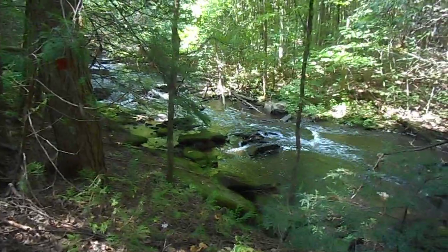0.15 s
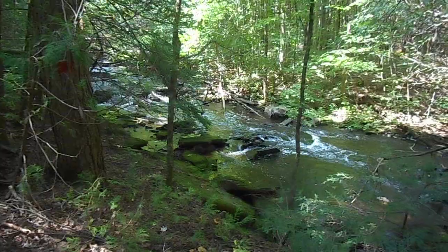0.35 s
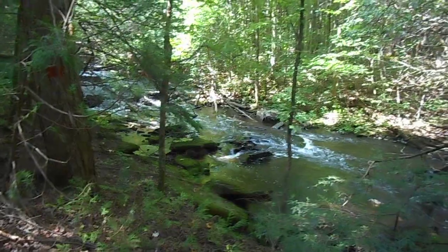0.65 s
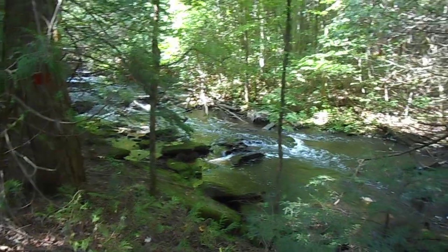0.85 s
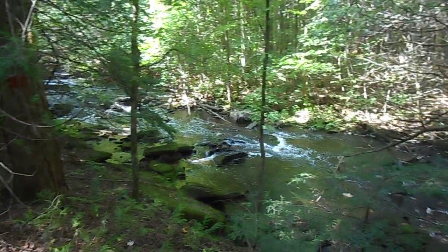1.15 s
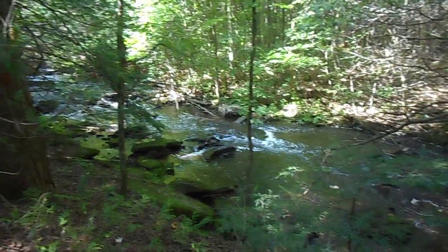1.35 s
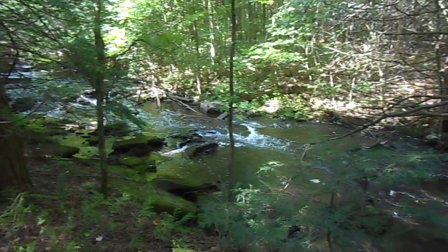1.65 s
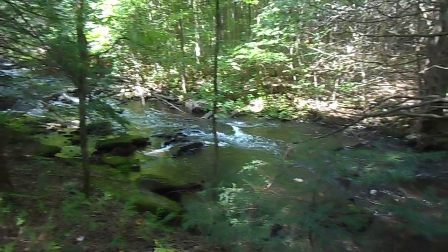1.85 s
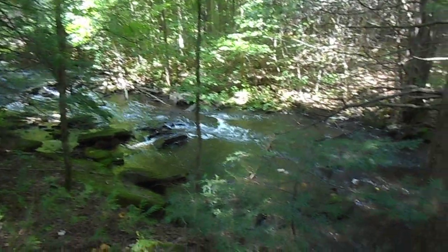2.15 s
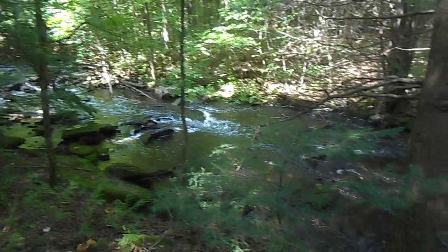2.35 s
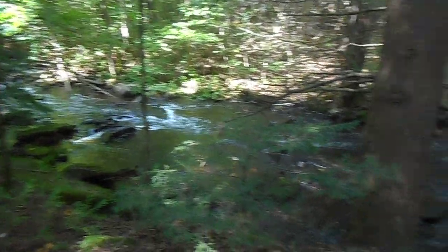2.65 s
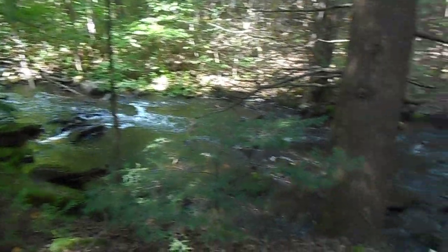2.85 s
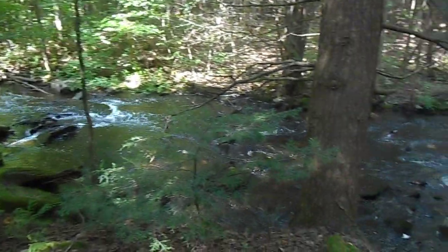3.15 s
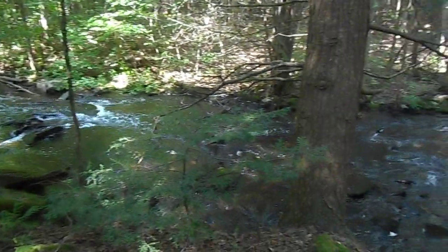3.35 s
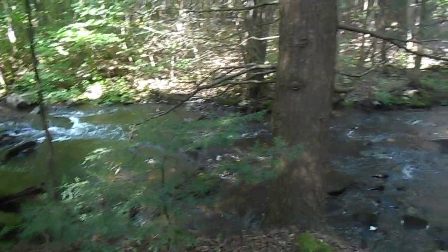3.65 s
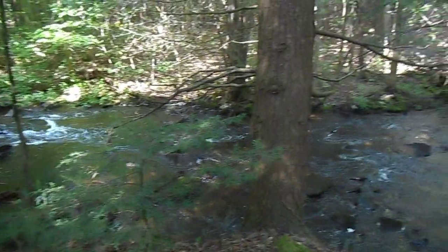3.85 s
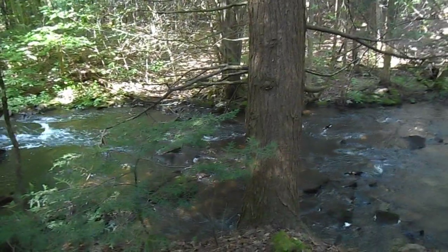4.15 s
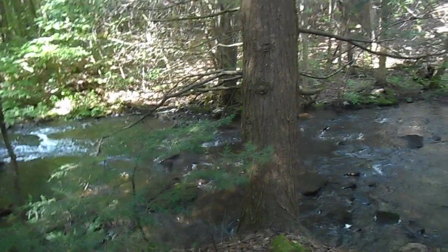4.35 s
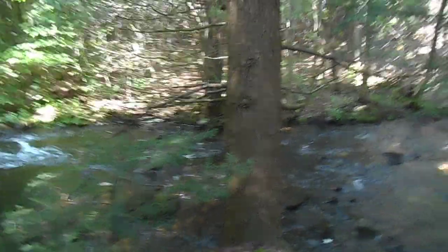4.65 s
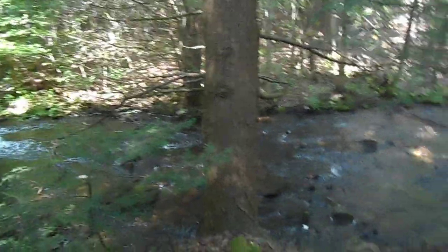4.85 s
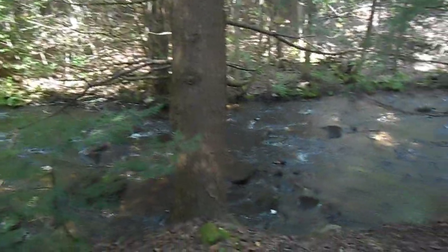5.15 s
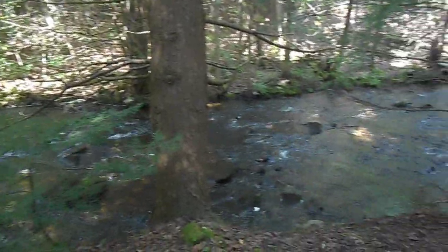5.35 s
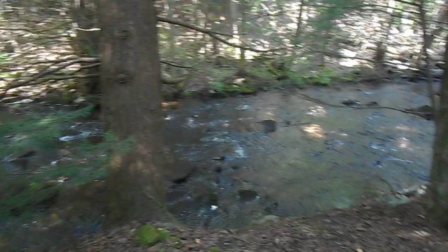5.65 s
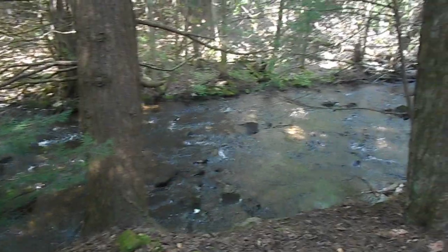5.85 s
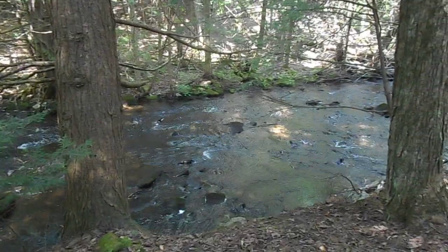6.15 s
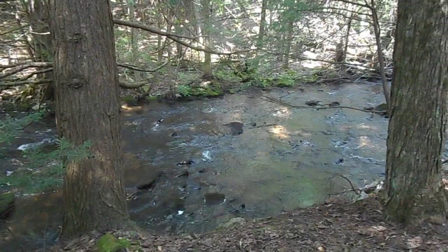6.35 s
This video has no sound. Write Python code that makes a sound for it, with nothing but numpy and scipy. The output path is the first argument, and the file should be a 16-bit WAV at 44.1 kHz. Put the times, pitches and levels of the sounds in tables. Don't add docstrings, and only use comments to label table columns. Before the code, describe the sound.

From 0 to 6.5 seconds a small creek pours over rocks in a wood, some metres away, in mono. It is a continuous dense hiss of innumerable bubbles, strongest in the midrange, with fine fizz above and tiny quick fluctuations; a barely audible low drone lies far behind. Soft breeze puffs bump the microphone at about 0.3-0.5 and 0.8-0.9 seconds, lightly around 1.5 and 2.3, then most strongly at 3.4-3.5, with a small one at 4.3-4.4. Faint spray ticks are scattered to about 4.2; clearer drops pop around 1.0, 1.7, 2.2, 2.5, 3.0 and 3.3. Short hollow gurgles surface now and then, mostly between 1 and 3 seconds. As the microphone turns to the pool, the hiss becomes slightly softer and duller. Drops snap at 5.9 and 6.1, and a louder clustered plop lands at 6.4 just before the end.

```python
import sys
import numpy as np
from scipy import signal
from scipy.fft import rfft, irfft, next_fast_len
from scipy.io import wavfile
from scipy.ndimage import uniform_filter1d, map_coordinates

SR = 44100
rng = np.random.default_rng(int(sys.argv[2]) if len(sys.argv) > 2 else 0)


def file_out(sig):
    cols = np.atleast_2d(sig).T
    lim = np.clip(cols, -1, 1)
    pcm = np.round(lim * 32767).astype(np.int16)
    wavfile.write(sys.argv[1], SR, pcm)


def nominal_scale(level):
    x = np.asarray(level, float) / 20
    return 10 ** x


N = 287091


def unit(x):
    return x / np.sqrt(np.mean(x ** 2) + 1e-20)


def curve(rows):
    time_s, value = np.transpose(rows)
    return np.interp(np.arange(N) / SR, time_s, value)


def wobble(knots_per_s):
    knots = rng.standard_normal(int(N * knots_per_s / SR) + 4)
    return map_coordinates(knots, [np.arange(N) * knots_per_s / SR])


def coloured(x, points):
    size = next_fast_len(N + 8192)
    freq_hz, level_db = np.transpose(points)
    log_f = np.log(np.fft.rfftfreq(size, 1 / SR) + 1)
    gain = nominal_scale(np.interp(log_f, np.log(freq_hz + 1), level_db))
    return irfft(rfft(x, size) * gain, size)[:N]


def patchy(depth_db):
    z = signal.stft(rng.standard_normal(N), nperseg=256)[2]
    field = rng.standard_normal(z.shape)
    field = uniform_filter1d(field, size=5, axis=0)
    field = uniform_filter1d(field, size=8, axis=1)
    return unit(signal.istft(z * nominal_scale(depth_db * unit(field)), nperseg=256)[1][:N])


def bubbles(start, gain, pitch_hz, cycles, size):
    t = np.arange(size) / SR
    age = t * (pitch_hz / cycles)[:, None]
    phase = 2 * np.pi * pitch_hz[:, None] * t * (1 + .1 * age)
    onset = 1 - np.exp(-age / .06)
    ring = gain[:, None] * np.sin(phase) * nominal_scale(-26 * age) * onset
    where = (start * SR).astype(int)[:, None] + np.arange(size)
    return np.bincount(where.ravel(), ring.ravel(), N + size)[:N]


def swarm(count, low_hz, high_hz, cycles, spread_db, size):
    when, pitch, luck = rng.random((count, 3)).T
    pitch_hz = low_hz + (high_hz - low_hz) * pitch
    gain = np.sqrt(pitch_hz) * nominal_scale(-spread_db * np.log(1.004 - luck))
    return unit(bubbles(when * N / SR, gain, pitch_hz, np.full(count, cycles), size))


# time_s, facing (0 riffle - 1 pool)
TURN = [
    (0, 0.12),
    (1, 0.056),
    (2.4, 0.28),
    (3.4, 0.21),
    (3.8, 0.57),
    (5.2, 0.64),
    (5.8, 1),
    (6.51, 0.93),
]


def facing_pool():
    return curve(TURN)


# freq_hz, width_hz, riffle_db, pool_db
HOLLOWS = [(350, 230, -1.5, 2.3), (700, 220, 1.5, -2.5), (1060, 160, 1.3, 1.5), (1350, 250, -3, 0),
           (1615, 110, 2.3, -.5), (2420, 460, 1.5, 1.4), (2740, 150, -1.5, -0.5), (3200, 340, 1, 0)]


def hollowed(x):
    size = next_fast_len(N + 8192)
    f = np.fft.rfftfreq(size, 1 / SR)
    freq_hz, width_hz, *views_db = np.transpose(HOLLOWS)[:, :, None]
    bump = 1 / (1 + ((f - freq_hz) / (width_hz / 2)) ** 2)
    spectrum = rfft(x, size)
    riffle, pool = (irfft(spectrum * nominal_scale((db * bump).sum(axis=0)), size)[:N] for db in views_db)
    turn = np.clip(facing_pool(), 0, 1)
    return (1 - turn) * riffle + turn * pool


# time_s, level_db
FLOW = [(0, -30), (.8, -30), (1.6, -30.5), (2.4, -30), (3.3, -31), (4.9, -30.5), (5.3, -31), (6.51, -31.5)]
# freq_hz, level_db (per Hz)
WATER = [(70, -44), (150, -24), (290, -12), (350, -14), (480, -10), (625, -2), (760, -0.26), (1050, -0.5),
         (2200, -3), (3300, -5.5), (4500, -10), (6300, -16.5), (8400, -25.5), (9500, -32.5)]
SPRAY_AWAY_DB = -1.46


def creek():
    water_db = curve(FLOW)
    spray_db = SPRAY_AWAY_DB * facing_pool()
    surge = 0.072 * wobble(6) + 0.34 * wobble(60) + 0.23 * wobble(300)
    gurgle = swarm(count=6000, low_hz=547, high_hz=3533, cycles=10.8, spread_db=1.5, size=800)
    fizz = swarm(count=7000, low_hz=2494, high_hz=10360, cycles=14.7, spread_db=3, size=200)
    crackle = swarm(count=1500, low_hz=5100, high_hz=10400, cycles=1.6, spread_db=2.5, size=30)
    body = unit(patchy(depth_db=0.34) + nominal_scale(-18.0) * gurgle)
    spray = unit(patchy(depth_db=0.07) + nominal_scale(-10.5) * fizz + nominal_scale(-16.5) * crackle)
    low = signal.butter(1, 2500, "low", fs=SR)
    high = signal.butter(1, 2500, "high", fs=SR)
    treble = nominal_scale(spray_db + 0.35 * surge) * signal.lfilter(*high, spray)
    mix = signal.lfilter(*low, body) + treble
    return nominal_scale(water_db - 0.27 + 1.08 * surge) * unit(hollowed(coloured(mix, WATER)))


# freq_hz, level_db (per Hz)
DRONE = [(60, -60), (90, -6), (107, -1), (125, -5), (170, -60)]


def distant_drone():
    return nominal_scale(-72) * unit(coloured(rng.standard_normal(N), DRONE))


# start_s, hold_s, level_db
GUSTS = [(.15, .03, -64), (0.312, 0.24, -52.5), (0.698, .04, -49), (.82, 0.15, -56), (1.03, .04, -59),
         (1.24, 0.089, -59), (1.38, .04, -68), (1.47, .04, -50), (1.6, .03, -64), (1.738, .04, -62),
         (1.85, .2, -67), (2.24, 0.078, -56), (2.45, .05, -58), (2.55, .04, -63), (2.76, .02, -56),
         (3.404, 0.11, -43.5), (3.65, .06, -60), (4.03, .02, -64), (4.29, .14, -59), (6.12, .03, -59),
         (6.25, .05, -64)]
# time_s, peak_db, pitch_hz
PUFFS = [(.342, -45, 110), (.405, -40, 120), (.423, -33.5, 237), (0.838, -41, 140), (0.847, -39, 120),
         (0.879, -43, 130), (.924, -47, 70), (1.26, -49, 80), (1.491, -51, 110), (1.75, -52, 60),
         (2.258, -46, 100), (2.292, -42, 120), (2.47, -48, 120), (2.55, -54, 80), (2.771, -46, 120),
         (3.392, -37, 220), (3.424, -33, 231), (3.44, -36, 300), (3.453, -40, 300), (3.461, -34, 250),
         (3.498, -39, 200), (3.51, -25.5, 270), (4.299, -52, 70), (4.345, -41, 150), (4.404, -46, 150)]
# freq_hz, level_db (per Hz)
RUMBLE = [(40, -28.5), (70, 2), (100, -4.5), (160, -3.5), (300, -9), (500, -40)]
# freq_hz, level_db (per Hz)
DEEP = [(8, -17), (25, 0.5), (55, -0.5), (80, -11.5), (120, -41)]
GUST_RISE_DB_PER_S, GUST_FALL_DB_PER_S = 400, 300
CALM_DB, DEEP_CALM_DB = -71.5, -71
DEEP_DB, DEEP_GROWS = -61, .3
SHELTER_DB = -11.5


def breeze():
    rumble = unit(nominal_scale(2.7 * wobble(30)) * coloured(rng.standard_normal(N), RUMBLE))
    deep = unit(nominal_scale(2.5 * wobble(20)) * coloured(rng.standard_normal(N), DEEP))
    t = np.arange(N) / SR
    start, hold, gust_db = np.transpose(GUSTS)[:, :, None]
    rise_db = -GUST_RISE_DB_PER_S * np.maximum(start - t, 0)
    fall_db = -GUST_FALL_DB_PER_S * np.maximum(t - start - hold, 0)
    shape_db = rise_db + fall_db
    shelter_db = SHELTER_DB * facing_pool()
    flutter = nominal_scale(CALM_DB) + nominal_scale((gust_db + shape_db).max(axis=0))
    deep_gust_db = DEEP_DB + DEEP_GROWS * (gust_db + 51)
    swell = nominal_scale(DEEP_CALM_DB) + nominal_scale((deep_gust_db + shape_db).max(axis=0))
    out = nominal_scale(-5.5) * flutter * rumble + nominal_scale(shelter_db) * swell * deep
    for time_s, peak_db, pitch_hz in PUFFS:
        near = slice(max(int((time_s - .04) * SR), 0), int((time_s + .04) * SR))
        u = 2 * np.pi * pitch_hz * (t[near] - time_s)
        out[near] += nominal_scale(peak_db) * (np.cos(u) + 0.37 * np.sin(u)) * np.exp(-u ** 2 / 12)
    return out


FAINT_DROPS = [.174, .45, .663, .688, 1.006, 1.542, 1.678, 2.408, 2.752, 3.917, 3.987, 3.998, 4.185]
FAINT_DROP_DB, FAINT_DROP_HZ, FAINT_DROP_CYCLES = -41, 8500, 3
# start_s, peak_db, pitch_hz, life_cycles
DROPS = [(1.612, -36, 8000, 6), (1.005, -25, 2900, 4), (1.713, -27, 3400, 20), (2.2215, -24, 4100, 9),
         (2.547, -22, 1500, 2), (2.9665, -26, 4000, 12), (3.2652, -27, 8600, 3), (3.339, -33, 7200, 4),
         (3.339, -27, 3900, 5), (3.667, -28, 5200, 6), (4.298, -34, 8800, 3), (5.9435, -21, 3300, 4),
         (6.1068, -25, 6500, 1.5), (6.155, -25, 2600, 5), (6.4072, -14, 1500, 3.5), (6.408, -24, 4300, 5),
         (6.4087, -22, 1100, 3), (6.4103, -23, 2000, 6), (6.4105, -22, 2800, 7), (6.416, -25, 1700, 6)]


def drops():
    faint_drops = [(start_s, FAINT_DROP_DB, FAINT_DROP_HZ, FAINT_DROP_CYCLES) for start_s in FAINT_DROPS]
    start_s, peak_db, pitch_hz, cycles = np.transpose(list(DROPS) + faint_drops)
    bursts = bubbles(start_s, nominal_scale(peak_db + 4), pitch_hz, cycles, size=300)
    return coloured(bursts, [(300, -40), (800, 0)])


# start_s, length_s, pitch_hz, level_db
POCKETS = [(1.05, .15, 1650, -36), (1.48, .16, 1620, -34), (1.62, .05, 1020, -35), (1.9, .08, 950, -36),
           (2.05, .2, 1620, -33), (2.45, .15, 1000, -36), (3.05, .15, 1650, -37), (4, .06, 800, -36),
           (5.2, .12, 1400, -36), (5.93, .04, 3400, -36), (6.3, .15, 1050, -36), (1.71, .02, 3500, -37),
           (1.85, .015, 2600, -37)]


def pockets():
    start_s, length_s, pitch_hz, level_db = np.repeat(POCKETS, 12, axis=0).T
    when, pitch, luck = rng.random((len(start_s), 3)).T
    gain = nominal_scale(level_db + 6 * luck)
    cycles = np.full(len(start_s), 22)
    return bubbles(start_s + length_s * when, gain, pitch_hz * (.9 + .14 * pitch), cycles, size=1500)


def scene():
    return (creek() + distant_drone() + breeze() + drops() + pockets())[None]


# freq_hz, level_db
ANTI_ALIAS = [(9500, 0), (9800, -3), (10030, -5), (10300, -9), (10550, -15), (10700, -20), (10820, -27),
              (10950, -50), (11000, -120)]
# freq_hz, level_db
SMOOTHING = [(9800, 0), (10340, -1.2), (10720, -3.5), (11025, -6), (11330, -9), (11710, -15),
             (11970, -21.5), (12230, -29), (12600, -50)]


def half_rate(x):
    every_other = 1 + (-1) ** np.arange(N)
    kept = coloured(x, ANTI_ALIAS) * every_other
    return coloured(kept, SMOOTHING)


def roll_off(x):
    return signal.sosfilt(signal.butter(12, 12400, fs=SR, output="sos"), x)


def record(dry):
    mix = half_rate(dry[0])[None]
    return roll_off(mix)


dry = scene()
out = record(dry)
file_out(out)
```